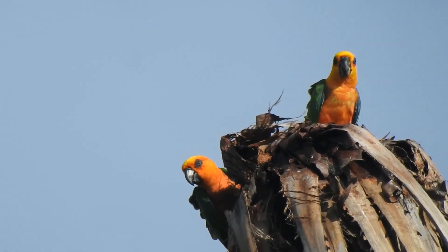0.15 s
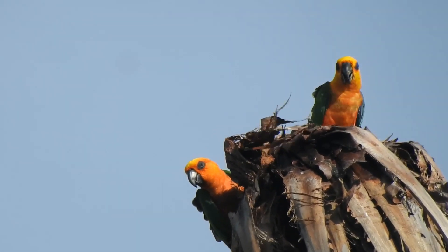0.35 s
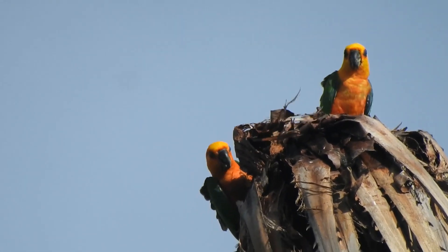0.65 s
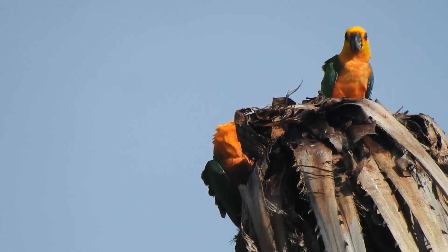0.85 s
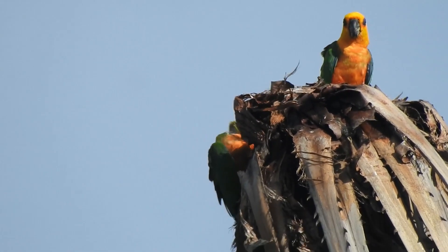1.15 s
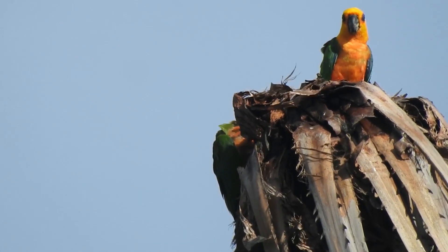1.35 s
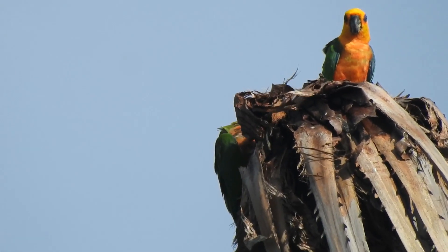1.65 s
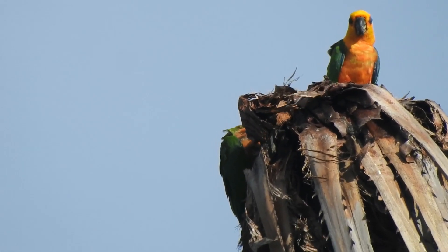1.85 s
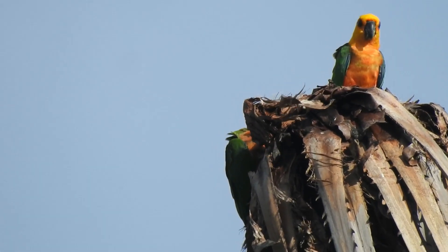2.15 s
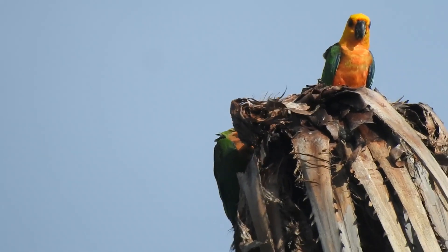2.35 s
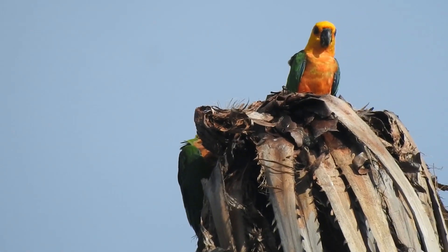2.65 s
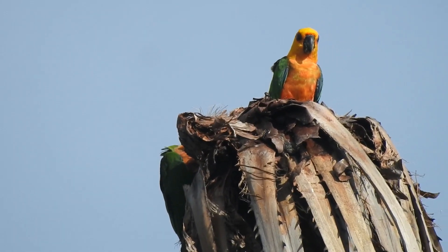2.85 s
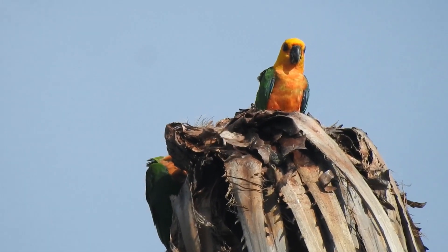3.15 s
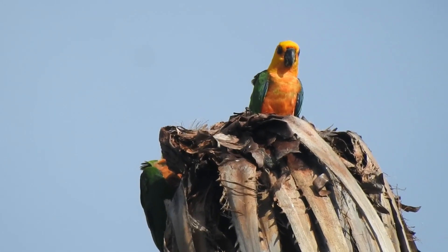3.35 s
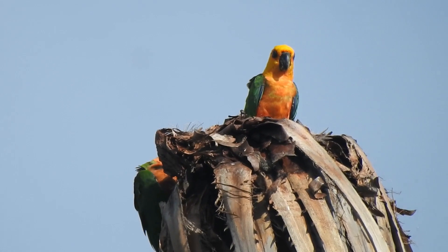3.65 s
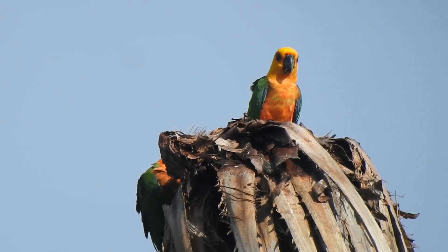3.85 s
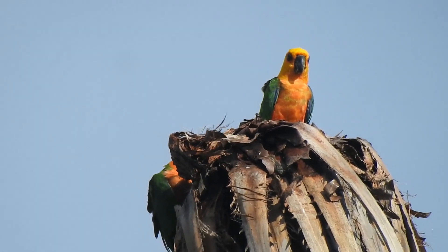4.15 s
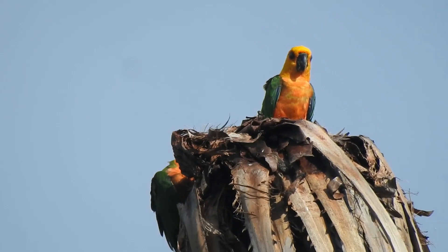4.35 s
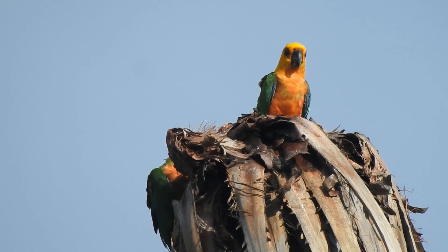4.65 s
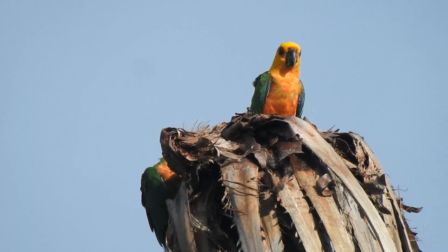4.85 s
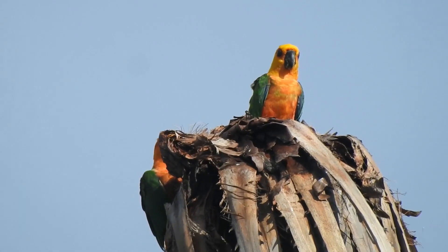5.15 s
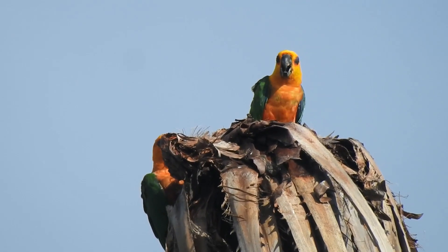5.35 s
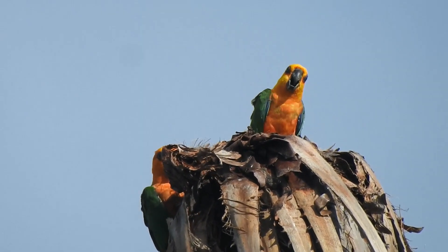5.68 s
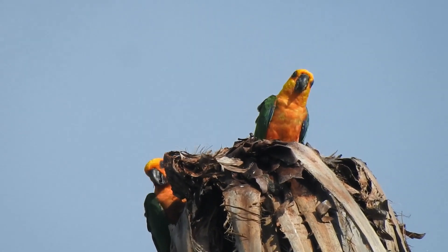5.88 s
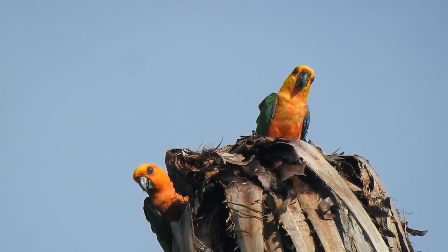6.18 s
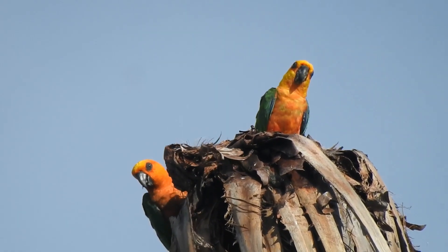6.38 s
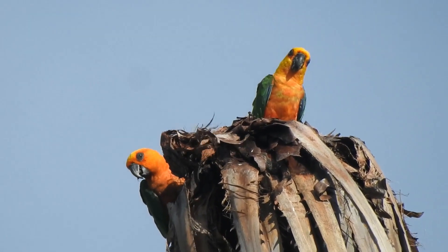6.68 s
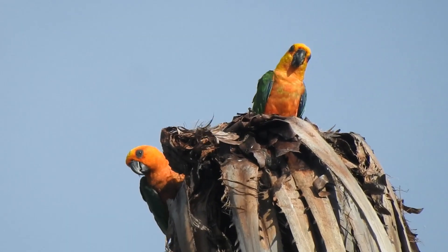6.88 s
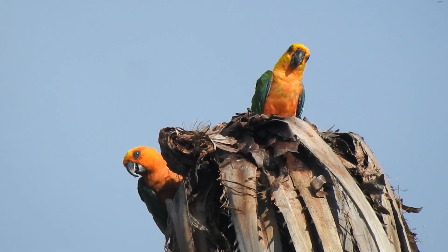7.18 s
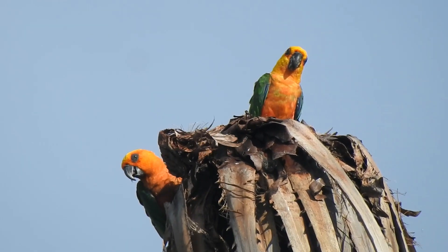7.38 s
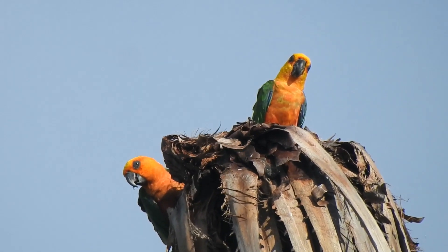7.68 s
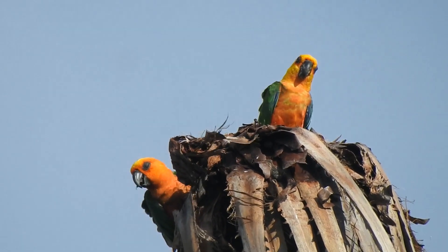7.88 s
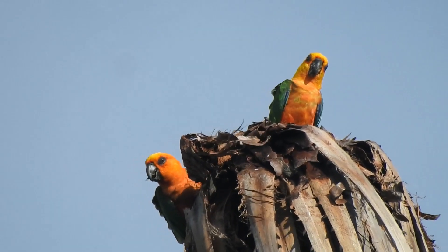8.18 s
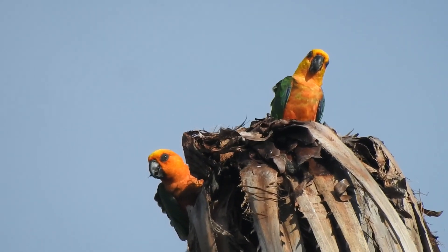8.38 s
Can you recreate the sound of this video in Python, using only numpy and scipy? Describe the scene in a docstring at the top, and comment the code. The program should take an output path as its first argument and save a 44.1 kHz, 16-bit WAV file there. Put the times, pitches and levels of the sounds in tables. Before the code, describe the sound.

The sound opens outdoors on the fading tail of a parakeet call, and at 0.3 seconds a nearby parakeet gives one short, harsh screech. Three faint, distant screeches follow between 0.9 and 1.4 seconds. Small birds whistle thinly far away from about 1.6 seconds. Dry palm fronds click around 2.5 seconds and crackle again between 4.4 and 4.9. Light gusts touch the microphone now and then, with one strong, low buffet at 3.9 seconds. From 5.4 to 6.6 seconds the near parakeet screeches loudly four times, each call brief and arched in pitch, slightly to the left, with a short echo from the trees. The distant songbirds then twitter more busily until about 8 seconds, with a softer gust near 7.8. A steady soft hiss, low rumble and a faint drone that comes and goes continue to the end at about 8.5 seconds.

```python
"""Parakeets on a dead palm trunk

The fading tail of an earlier screech, one near screech, three faint far ones, then a near bout of
four. Each is a harmonic series on an arched pitch, which the trees scatter back. Small birds
whistle in the distance and dry fronds click. Beneath them lie outdoor rumble, hiss and a faint
drone, and gusts buffet the microphones, one of them strongly."""
import sys
import numpy as np
from scipy import signal
from scipy.fft import rfft, irfft, next_fast_len
from scipy.io import wavfile
from scipy.ndimage import uniform_filter1d

SR = 44100
rng = np.random.default_rng(int(sys.argv[2]) if len(sys.argv) > 2 else 0)


def to_wav(s):
    """Save 16-bit WAV."""
    ch = np.atleast_2d(s).T  # columns
    pcm = np.round(np.clip(ch, -1, 1) * 32767)  # PCM
    wavfile.write(sys.argv[1], SR, pcm.astype(np.int16))


N = 375732

# Harmonics 1 to 13 of the voice. Each row: near level, far level, change over the call and change
# when slack, all in dB.
PARTIALS = [(-41.5, -22, -4, 4), (-16.5, 0, -6.5, -9), (-10.5, -0.5, 9, -17.5), (-5, 2.5, 3, -5.5),
            (-9, -9.5, 11, -7.5), (-0.5, 2.5, 1, 0), (-19.5, -12, 12, 1), (-24.5, -30, 2, 14),
            (-31.5, -37, 18, -2), (-36.5, -45, 3, 7.5), (-44, -50, 21, -6), (-64, -60, 4, 14),
            (-63, -65, 0, 0)]
def screech(row, partials_db, bands, attack_s, release_s,
            jitter=0.00056, strain=0.0088, flutter_db=2, rasp_db=-40):
    """Harmonic oscillation of the syrinx: clean atop the arch of its pitch, rough where it is slack."""
    start, length, pitch_hz, sag, scoop_s, fall_s, level_db, swell_db, odd_db, tilt_db = row
    t = np.arange(0, length, 1 / SR)
    progress = t / length - .5
    scoop = .2 * np.exp(-t / scoop_s)
    fall = .22 * np.exp((t - length) / fall_s)
    hz = pitch_hz * (1 - scoop - fall) - sag * t
    slack = np.clip((1 - hz / hz.max()) / .11, 0, 1)  # fully slack 11% below the top of the arch
    unsteady_hz = hz * (1 + (jitter + strain * slack) * wander(len(t), 370))
    phase = 2 * np.pi * np.cumsum(unsteady_hz) / SR
    voice = np.zeros(len(t))
    for k, (db, (_, _, drift_db, slack_db)) in enumerate(zip(partials_db, PARTIALS), start=1):
        db += odd_db * (k % 2) + tilt_db * np.log2(k / 6)
        db += drift_db * progress + slack_db * slack
        db += sum(gain_db * np.exp(-((k * hz - centre) / width) ** 2) for centre, width, gain_db in bands)
        # Turbulence lays a skirt of noise around each partial.
        rasp = amp(rasp_db) * (1 + 16 * slack ** 2) * wander(len(t), 570)
        db += flutter_db * wander(len(t), 52)
        voice += amp(db) * (1 + rasp) * np.cos(k * phase + 2 * np.pi * rng.random())
    envelope = np.minimum(t / attack_s, 1) * np.minimum((length - t) / release_s, 1)
    return start, np.sqrt(2) * amp(level_db + swell_db * progress) * envelope * voice


# Near screeches. Each row: start and length in seconds, pitch in Hz, sag in Hz per second, scoop and
# fall times in seconds, level, swell and odd-partial gain in dB, tilt in dB per octave, lean to the
# left in dB, squeak pitch in Hz.
NEAR_CALLS = [(0.292, 0.17, 1190, 714, 0.014, 0.012, -17, -0.5, -1.5, -2, 1.2, 3180),
              (5.37, 0.17, 1179, 594, 0.014, 0.0093, -14, -1, -1, 1.5, 2, 3550),
              (5.678, 0.17, 1145, 148.5, 0.0082, 0.022, -17, -0.5, -1.5, -0.5, 2.5, 3600),
              (6.064, 0.18, 1110, 231.4, 0.00666, .0167, -17.5, 5.5, -1, 2, 3, 3000),
              (6.4343, 0.17, 1081, 130, 0.0055, 0.019, -20.5, 1.5, -4.5, 2.5, 3, 3790)]
# Interference bands of the bounce off the trunk. Each row: centre and half width in Hz, gain in dB.
TRUNK_BANDS = [(2132, 24, -20), (3182, 75, 11), (3242, 57, -19.5), (4327, 24, -8), (4430, 35, -10),
               (4565, 57, -5.5), (6656, 87, -2), (8450, 200, -5), (10980, 120, 5), (11240, 230, -18)]
# Phase between the microphones. Each row: frequency in Hz, lead of the left in radians.
LEFT_LEAD = [(0, 0), (3000, 0), (5500, -.4), (6500, -.8), (9000, -.7), (15000, 0)]
def near_parakeets():
    """Interference: partials glide through bands that the trunk's reflection cancels or reinforces."""
    out = np.zeros((2, N))
    near_db = [partial[0] for partial in PARTIALS]
    for *row, lean_db, squeak_hz in NEAR_CALLS:
        # The syrinx squeaks as it starts up.
        squeak = whistle(row[0] - .012, 0.013, squeak_hz, glide_hz=500, db=-37, warble=0.052)
        call = screech(row, near_db, TRUNK_BANDS, attack_s=0.0086, release_s=0.017)
        for start, sound in (squeak, call):
            add(out[0], start, sound * amp(lean_db / 2))
            add(out[1], start, sound * amp(-lean_db / 2))
    lead = spectrum_at(LEFT_LEAD, np.fft.rfftfreq(N, 1 / SR))
    return irfft(rfft(out) * np.exp(.5j * np.array([lead, -lead])), N)


# The fading tail of an earlier screech at the very start, then three far screeches.
# Each row: the columns of NEAR_CALLS up to the tilt.
FAINT_CALLS = [(-.14, 0.17, 1158, 248.4, 0.0095, 0.015, -34, 0, -8, 9),
               (.91, 0.12, 1060, 50, 0.03, 0.017, -50, 0, 1, -5),
               (1.16, 0.21, 1140, 147.6, 0.032, 0.026, -41.5, 0, -0.5, -1),
               (1.279, .125, 1018, 98.7, 0.02, 0.014, -42.5, 0, -2, -1)]
def faint_screeches():
    """The same harmonic source as an echo tail or from afar: rougher, with stronger low partials."""
    out = np.zeros(N)
    far_db = [partial[1] for partial in PARTIALS]
    for row in FAINT_CALLS:
        add(out, *screech(row, far_db, [], attack_s=0.086, release_s=0.033,
                          jitter=0.002, strain=0.015, flutter_db=1, rasp_db=-20))
    return out


def whistle(start, length, pitch_hz, glide_hz, db, warble, warble_hz=217):
    """Frequency modulation: a sine tone with soft ends glides and warbles at random."""
    progress = np.linspace(-.5, .5, max(round(length * SR), 8))
    hz = (pitch_hz + glide_hz * progress) * (1 + warble * wander(len(progress), warble_hz))
    tone = np.sin(2 * np.pi * np.cumsum(hz) / SR)
    return start, amp(db) * unit_rms(tone * signal.windows.tukey(len(tone), .6))


# Distant song. Each row: start and length in seconds, pitch and glide in Hz, level in dB, warble as
# a fraction of the pitch.
SONG_NOTES = [(1.596, 0.042, 2820, -350, -47.5, 0.011), (1.821, .13, 2750, 200, -50.5, 0.011),
              (1.935, 0.072, 2354, -30, -47.5, .004), (2.33, 0.084, 1963, -80, -49.5, .006),
              (2.998, .1, 5250, 650, -49, .003), (3.177, 0.076, 4230, 604, -43, 0.081),
              (3.495, .045, 2930, -240, -46, 0.0071), (3.762, 0.039, 4720, 96, -47.5, .004),
              (3.978, .045, 5000, -220, -45.5, .005), (4.45, .065, 4650, -30, -51, .002),
              (4.86, 0.039, 4780, -450, -50.5, .02), (6.689, 0.062, 3980, -52, -42, 0.036),
              (6.799, 0.11, 3950, -69, -49, .013), (6.909, 0.047, 3400, -200, -49, .03),
              (7.003, .13, 3740, 43, -47, 0.021), (7.02, 0.1, 2400, 32, -55, .004),
              (7.15, 0.09, 4020, -2, -46, 0.037), (7.204, 0.065, 3620, -90, -41, 0.023),
              (7.349, 0.12, 3700, 72, -43.5, 0.039), (7.398, 0.061, 2840, 0, -52, 0.017),
              (7.452, 0.08, 3890, 20, -44, 0.042), (7.63, .17, 4590, 55, -48, 0.047),
              (7.661, 0.15, 4020, 4, -46, .055), (7.554, 0.59, 3230, 171.5, -54.5, 0.075),
              (7.777, .25, 4760, 653, -47, 0.065), (8.006, 0.067, 3720, -67, -43.5, 0.011)]
def songbirds():
    """Nearly pure tones: each note is a single frequency-modulated partial."""
    out = np.zeros(N)
    for row in SONG_NOTES:
        add(out, *whistle(*row))
    return out


# Beak and claws on dry fronds. Each row: time of the peak in seconds, level in dB, centre in Hz,
# width in octaves, time to decay by 60 dB in seconds.
FROND_CLICKS = [(2.519, -34, 1050, 0.35, 0.039), (2.520, -32.5, 3100, 0.39, 0.017),
                (2.529, -32, 5530, 0.31, 0.023), (2.718, -35.5, 6000, .21, 0.035),
                (4.404, -36, 1170, 1.24, 0.19), (4.409, -32, 3500, 0.13, 0.073),
                (4.4138, -27, 5400, 0.37, 0.043), (4.424, -37.5, 4970, .43, 0.3),
                (4.761, -30, 8040, .17, 0.02), (4.89, -38.5, 6160, 0.27, .025),
                (6.993, -30.5, 6460, 0.26, 0.0077)]
def fronds():
    """Damped vibration: each click is a band of crackle in dry wood that decays exponentially."""
    out = np.zeros(N)
    t = np.arange(SR // 4) / SR
    hz = np.fft.rfftfreq(len(t), 1 / SR) + 1
    for peak_s, db, centre_hz, octaves, t60 in FROND_CLICKS:
        band = np.exp(-.5 * (np.log2(hz / centre_hz) / octaves) ** 2)
        crackle = unit_rms(irfft(rfft(rng.standard_normal(len(t))) * band, len(t)))
        rise_s = 0.044 * t60
        envelope = np.minimum(t / rise_s, 1) * amp(db - 60 * np.maximum(t - rise_s, 0) / t60)
        add(out, peak_s - rise_s, envelope * crackle)
    return out


def rustle(per_second=70, level_db=-58, spread_db=3, t60=0.018):
    """Shot noise: tiny ticks of dry leaves, at random times, give the hiss a grain."""
    ticks = (rng.random(N) < per_second / SR) * amp(spread_db * np.minimum(rng.exponential(1, N), 2))
    envelope = signal.lfilter([1], [1, -amp(-60 / (t60 * SR))], ticks)
    band = signal.butter(4, [4800, 7600], "bandpass", fs=SR, output="sos")
    return amp(level_db) * unit_rms(signal.sosfilt(band, envelope * rng.standard_normal(N)))


# Gusts. Each row: time of the peak in seconds, level in dB, rise and hold in seconds.
GUSTS = [(1.796, -50, .1, .05), (2.417, -48, .08, 0.04), (3.864, -33, .05, 0.12),
         (6.538, -51, 0.057, 0.029), (7.83, -43, .15, 0.075)]
# Spectrum of the buffeting. Each row: frequency in Hz, relative density in dB.
BUFFET_SPECTRUM = [(20, -30), (36, -13), (48, -5.5), (65, 0.5), (110, -9.5), (200, -9), (320, -22),
                   (900, -36), (2000, -95)]
def wind(thrum_hz=48, thrum_db=-3, fade_db_per_s=69):
    """Pressure fluctuation: gusts buffet both microphones nearly alike and set off a deep thrum."""
    t = np.arange(N) / SR
    force = np.zeros(N)
    for peak_s, db, rise_s, hold_s in GUSTS:
        onset = np.clip(1 + (t - peak_s) / rise_s, 0, 1) ** 2
        force += onset * amp(db - fade_db_per_s * np.maximum(t - peak_s - hold_s, 0))
    buffet = stereo_noise(BUFFET_SPECTRUM, patchy_db=0.5, correlation=[(40, 1.0), (300, 0.96)])
    hz = thrum_hz * (1 + 0.034 * wander(N, 5.9))
    thrum = np.sqrt(2) * np.sin(2 * np.pi * np.cumsum(hz) / SR)
    return (amp(-5.5) * buffet + amp(thrum_db) * thrum) * force


# Swells of the drone. Each row: start and length in seconds, pitch and glide in Hz, level in dB.
DRONE_SWELLS = [(.85, 0.57, 158, 0.5, -54), (2.03, 0.39, 158, -1.5, -53), (2.68, 0.18, 188, 38, -52),
                (2.82, 0.15, 209, 2, -46), (4.55, .8, 207, -1, -56), (5.7, .7, 197.4, -0.5, -59.5),
                (6.85, 0.48, 205, -2.5, -54.5), (7.95, 0.56, 122.2, -9.5, -55)]
def drone(waver=0.016, flutter_db=2):
    """Slow modulation of pitch and amplitude: a low tone wavers as it comes and goes."""
    out = np.zeros(N)
    for row in DRONE_SWELLS:
        add(out, *whistle(*row, warble=waver, warble_hz=28))
    return out * amp(flutter_db * wander(N, 5.6))


# Spectra of the outdoor noise. Each row: frequency in Hz, relative density in dB.
RUMBLE_SPECTRUM = [(15, -56), (25, -28), (36, -51), (51, -2), (63, 3), (78, -2.5), (91, -2.5), (199, -0.5),
                   (234, -9.5), (341, -13.5), (422, -9), (470, -14.5), (553, -4), (749, -12.5), (1150, -10),
                   (1800, -20.5), (2340, -35), (3960, -120)]
HISS_SPECTRUM = [(1060, -35), (1800, -1), (1880, -4), (2060, -3), (2730, -3.5), (3180, -1.5), (3520, -3),
                 (5280, 1.5), (5730, 2), (6390, 5), (7450, -2), (10700, -18), (15600, -30)]
# Their slow drift. Each row: time in seconds, relative level in dB.
RUMBLE_LEVEL = [(0, -47.5), (1.3, -47), (3.2, -48.5), (4.8, -48), (6.8, -50.5), (7.9, -50.5), (8.5, -47)]
HISS_LEVEL = [(0, -42.5), (1.6, -42.5), (3.1, -44.5), (5.2, -45.5), (7, -44.6), (8.5, -46.3)]
# Likeness of the channels. Each row: frequency in Hz, left-right correlation from -1 to 1.
CORRELATION = [(60, 0.79), (130, 0.71), (290, 0.79), (640, 0.93), (1410, 0.85), (3100, 0.78), (6820, 0.13),
               (15000, -0.29)]
def background():
    """Superposition: broadband outdoor rumble and flickering hiss add to the drone and the wind."""
    rumble = stereo_noise(RUMBLE_SPECTRUM, patchy_db=2.5, correlation=CORRELATION)
    rumble *= amp(time_curve(RUMBLE_LEVEL) + 2.5)
    hiss = stereo_noise(HISS_SPECTRUM, patchy_db=1.7, correlation=CORRELATION)
    hiss *= amp(time_curve(HISS_LEVEL) - 0.4 + 0.95 * wander(N, 44))
    return (rumble + drone() + wind()) * amp([[.9], [-.9]]) + hiss * amp([[.6], [-.6]])


def stereo_noise(spectrum, patchy_db, correlation):
    """Partial coherence: two channels share part of a coloured noise whose level drifts in patches."""
    frames, hz = N // 512 + 5, np.fft.rfftfreq(2048, 1 / SR)
    left_re, left_im, own_re, own_im, patches = rng.standard_normal((5, frames, len(hz)))
    patches = uniform_filter1d(patches, size=6, axis=0)
    patches = unit_rms(uniform_filter1d(patches, size=12, axis=1))
    shared = np.clip(spectrum_at(correlation, hz), -1, 1)
    left = left_re + 1j * left_im
    right = shared * left + np.sqrt(1 - shared ** 2) * (own_re + 1j * own_im)
    spectra = np.array([left, right]) * amp(spectrum_at(spectrum, hz) + patchy_db * patches)
    _, noise = signal.istft(spectra.swapaxes(1, 2), nperseg=2048, noverlap=1536)
    return unit_rms(noise[:, :N])


def scatter(x, t60, delay_s, band_hz):
    """Scattering: trunks and leaves return sparse echoes, and leaves throw back short waves best."""
    t = np.arange(SR) / SR
    echoes = rng.standard_normal((2, SR)) * (rng.random((2, SR)) < .1)
    echoes *= (t > delay_s) * amp(-60 * t / t60)
    echoes = signal.sosfilt(signal.butter(2, band_hz, "bandpass", fs=SR, output="sos"), echoes)
    echoes /= np.linalg.norm(echoes, axis=1, keepdims=True)
    return signal.fftconvolve(x[None], echoes, axes=1)[:, :N]


def amp(db):
    """Decibels to amplitude ratio."""
    return 10 ** (np.asarray(db) / 20)


def unit_rms(x):
    """Normalisation to rms 1."""
    return x / np.sqrt(np.mean(x ** 2) + 1e-20)


def spectrum_at(points, hz):
    """Interpolation on a log-frequency axis."""
    point_hz, values = np.transpose(points)
    return np.interp(np.log(hz + 1), np.log(point_hz + 1), values)


def time_curve(points):
    """Linear interpolation at every sample."""
    return np.interp(np.arange(N) / SR, *np.transpose(points))


def add(mix, start, sound):
    """Superposition of a sound on the mix, from a start in seconds."""
    at = round(start * SR)
    sound = sound[max(-at, 0):]
    part = mix[max(at, 0):][:len(sound)]
    part += sound[:len(part)]


def wander(size, hz):
    """Low-pass noise of rms about 1, with changes up to about hz."""
    padded = next_fast_len(size + 8192)
    lowpass = np.exp(-.5 * (np.fft.rfftfreq(padded, 1 / SR) / hz) ** 2)
    return unit_rms(irfft(rfft(rng.standard_normal(padded)) * lowpass, padded))[:size]


def scene():
    """Direct and reverberant fields: far sounds owe a larger share to the trees than near ones."""
    near = near_parakeets() + (fronds() + rustle()) * amp([[.8], [-.8]])
    far = faint_screeches() + songbirds()
    near_mono = near.mean(0)
    direct = near * amp([[.5], [.1]]) + far * amp([[-2], [-3.5]])
    close_echoes = scatter(amp(-8) * near_mono + amp(-7.5) * far,
                           t60=0.16, delay_s=0.00069, band_hz=(3660, 9400))
    grove_echoes = scatter(amp(-22) * near_mono, t60=0.62, delay_s=0.045, band_hz=(3350, 6100))
    far_echoes = scatter(amp(-7) * far, t60=0.66, delay_s=0.01, band_hz=(2410, 6800))
    low_echoes = scatter(amp(-27.5) * near_mono, t60=0.76, delay_s=0.014, band_hz=(1800, 3300))
    return direct + close_echoes + grove_echoes + low_echoes + far_echoes + background()


def record(dry):
    """Band limiting: a steep low-pass filter removes the highest treble."""
    lowpass = signal.firwin(511, cutoff=15750, window=("kaiser", 9), fs=SR)
    return signal.oaconvolve(dry, lowpass[None], "same")


dry = scene()
out = record(dry)
to_wav(out)
```